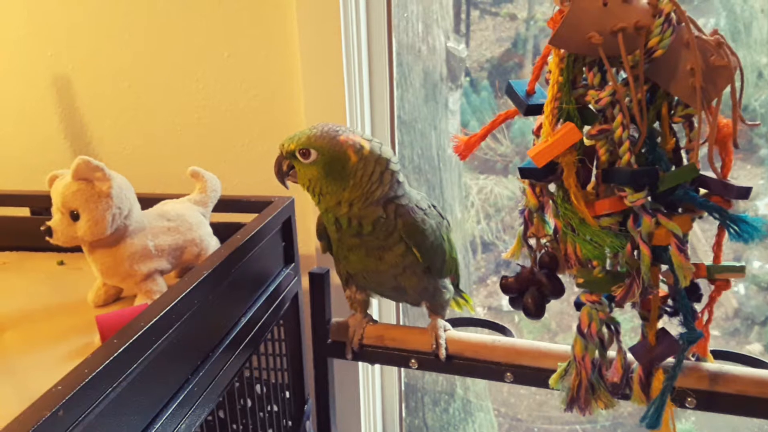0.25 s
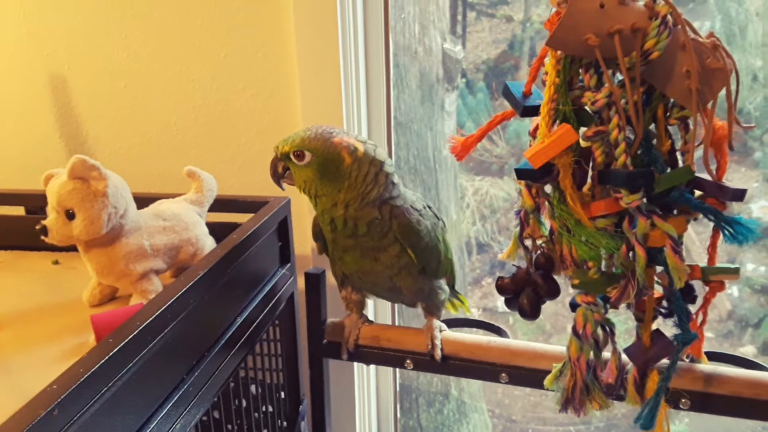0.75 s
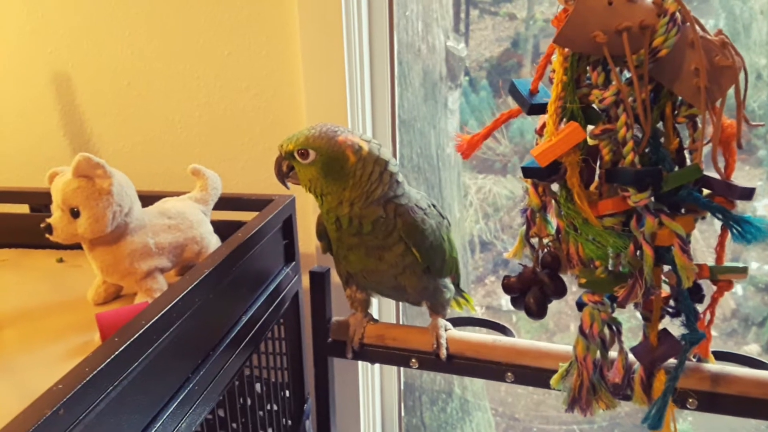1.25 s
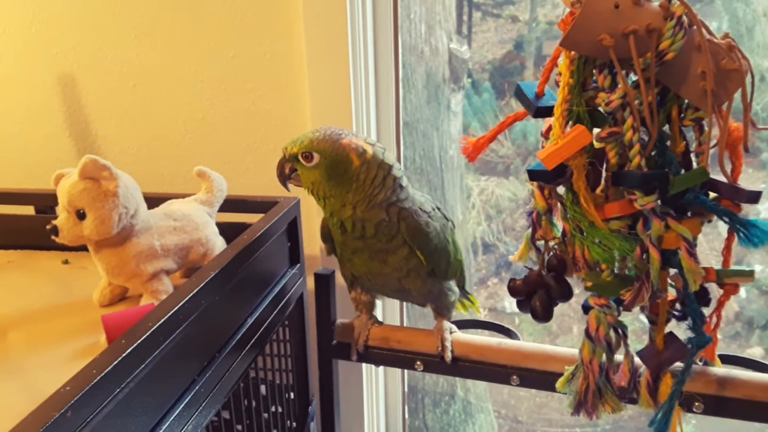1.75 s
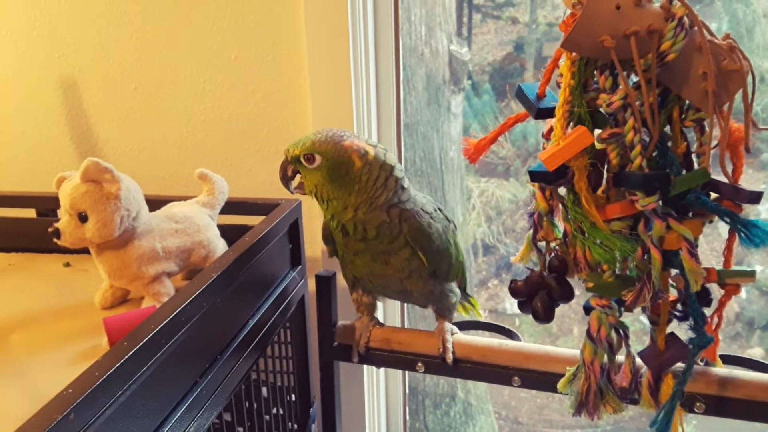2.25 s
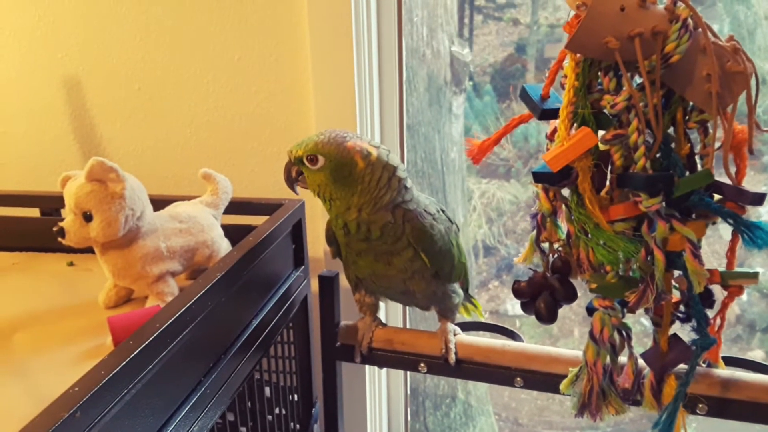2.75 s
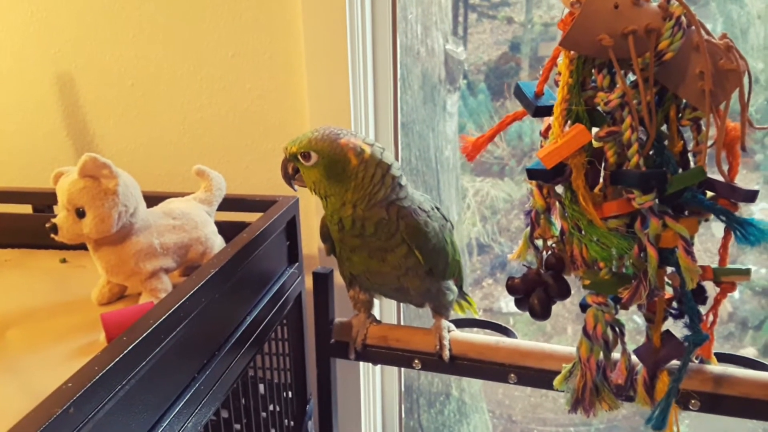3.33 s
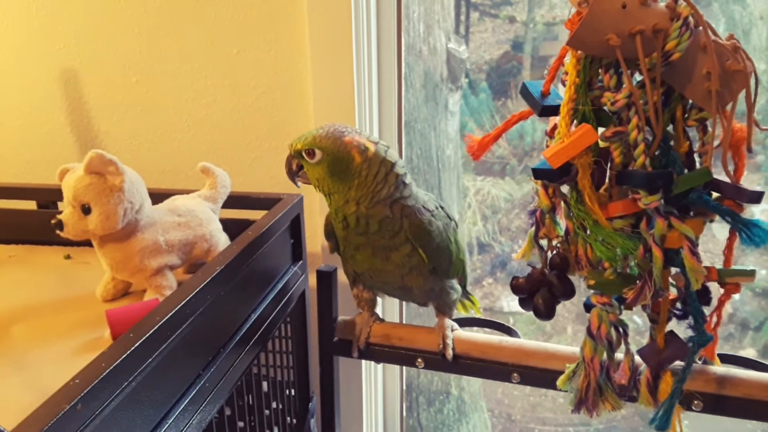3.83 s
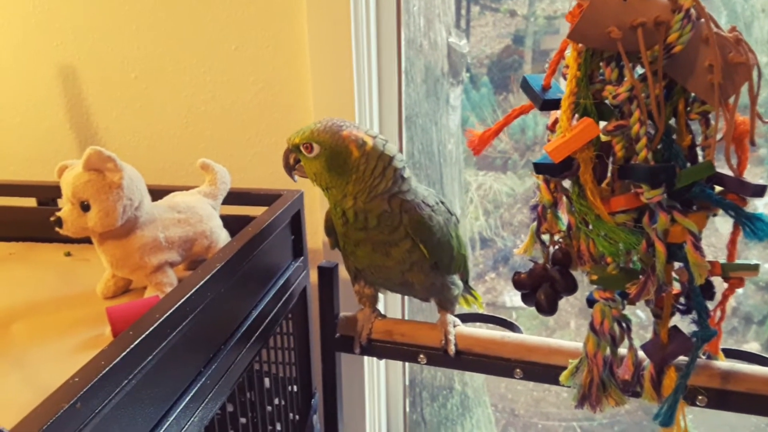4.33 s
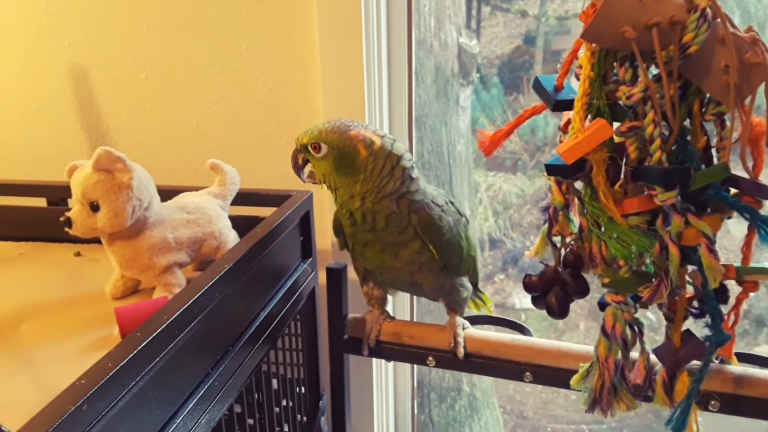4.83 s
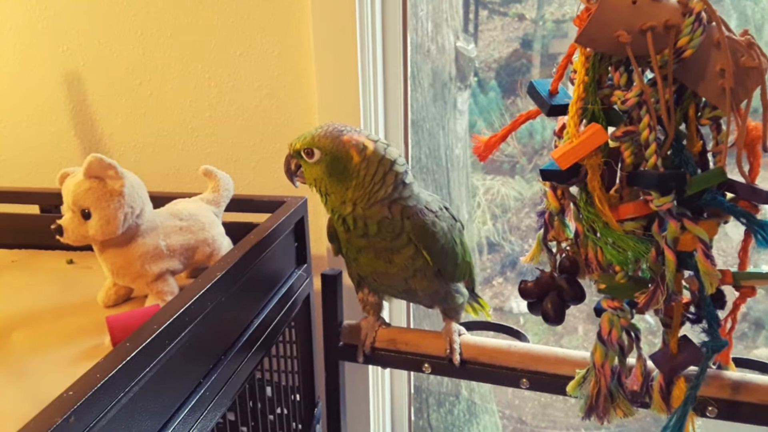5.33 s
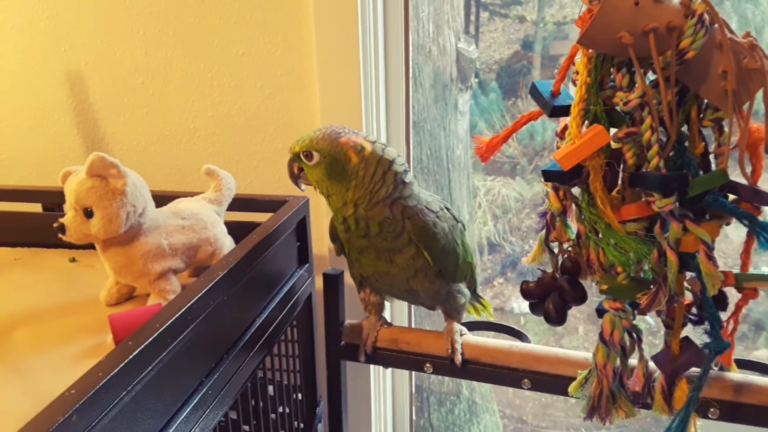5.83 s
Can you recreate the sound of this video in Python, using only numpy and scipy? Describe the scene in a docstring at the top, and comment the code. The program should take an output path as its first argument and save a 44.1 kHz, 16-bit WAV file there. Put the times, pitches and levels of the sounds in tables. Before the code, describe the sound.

Close, harsh parrot calls ring briefly in a small room over faint low hum, with a rattling trill late between silences.

```python
"""In a small furnished room a parrot on a perch squawks an arm's length from a phone with two microphones.
Its voice is a stack of overtones weighed by a throat resonance that moves with the pitch and by the beak, plus
breath noise; it breaks into a rasp in places, and the fourth call heard is a trill. Reflections and a decaying
noise tail make the walls ring after each call, and at the start after a call of which only the echo is heard.
Filtered noise makes a low household hum and a faint, flickering high hiss."""
import sys
import numpy as np
from scipy import signal
from scipy.fft import rfft, irfft
from scipy.io import wavfile
from scipy.ndimage import uniform_filter1d, minimum_filter1d

SR = 44100
rng = np.random.default_rng(int(sys.argv[2]) if len(sys.argv) > 2 else 0)


def file_out(sig):
    """Save sig as 16-bit WAV at sys.argv[1]."""
    # one column per channel
    cols = np.atleast_2d(sig).T
    # limit, then scale
    lim = np.clip(cols, -1, 1)
    pcm = np.round(lim * 32767).astype(np.int16)
    wavfile.write(sys.argv[1], SR, pcm)


def magnitude_from_level(level_db):
    """Linear magnitude for a level in decibels (20 dB per decade)."""
    exponent = np.asarray(level_db, float) / 20
    return 10 ** exponent


N = 268348
LEAD_S = 0.25  # computed ahead of time zero, to hold the earlier call
TIME = np.arange(-int(LEAD_S * SR), N) / SR
M = len(TIME)


def on_log(points, hz, column=1):
    """Interpolates a frequency response linearly on a logarithmic frequency axis."""
    p = np.array(points, float)
    return np.interp(np.log(hz + 1e-9), np.log(p[:, 0]), p[:, column])


def shaped(x, gain):
    """Linear filtering: the spectrum is multiplied by a gain given as a function of Hz."""
    n = x.shape[-1]
    return irfft(rfft(x) * gain(np.fft.rfftfreq(n, 1 / SR)), n)


def band(x, hz, octaves):
    """Band-pass filtering with a Gaussian bell on a logarithmic frequency axis."""
    return shaped(x, lambda f: np.exp(-0.5 * (np.log2(np.maximum(f, 1) / hz) / octaves) ** 2))


def wander(rate):
    """Low-passed noise: a smooth random course that turns about rate times a second, with spread 1."""
    x = shaped(rng.standard_normal(M), lambda f: np.exp(-0.5 * (f / rate) ** 2))
    return x / x.std()


def hum():
    """Stationary coloured noise: a household rumble, coherent at both ports in the bass, not above."""
    # Spectral shape of the mid signal. Each row: frequency in Hz, relative density in dB.
    spectrum = [(15, -75.5), (25, -30), (50, -25), (62, -15.5), (93, -2), (221, -2), (267, -6), (331, -3),
                (433, -15.5), (804, -22), (997, -27.5), (2230, -37.5), (3830, -55), (15500, -49.5)]
    # Stereo width of the hum. Each row: frequency in Hz, side minus mid in dB.
    width = [(60, -18.5), (110, -16), (200, -16), (380, -8), (700, -6), (1290, 1.5), (2380, 2), (4400, 3.5),
             (8120, -0.5), (15000, 3)]
    mid_db = -48.5  # rms level of the mid signal
    noise = rng.standard_normal((2, M))
    mid, side = shaped(noise, lambda f: magnitude_from_level(on_log(spectrum, f)) * (f > 15))
    side = shaped(side, lambda f: magnitude_from_level(on_log(width, f)))
    return magnitude_from_level(mid_db) / mid.std() * (mid + side * np.array([[1], [-1]]))


def thin_hiss():
    """Narrow-band noise: a faint high hiss whose level flickers by random amplitude modulation."""
    # Course of the hiss. Each row: time in seconds, level in dB before the trim and flicker below.
    course = [(.1, -83), (.5, -78), (.9, -95.5)]
    trim_db, flicker_db = -2, 1.5
    x = band(rng.standard_normal((2, M)), 11000, 0.028)
    level_db = np.interp(TIME, *np.transpose(course)) + trim_db + flicker_db * wander(12)
    return x / x.std() * magnitude_from_level(level_db)


def room(x):
    """Room acoustics: direct sound shaded by the phone, early reflections, then exponential reverberant decay."""
    # Decay of the tail. Each row: frequency in Hz, reverberation time (60 dB) in seconds,
    # relative level in dB before the whole tail is scaled.
    decay = [(600, 0.39, -2), (1500, 0.43, 1), (4470, 0.36, 3), (9000, 0.23, 1)]
    # Shading by the phone. Each row: frequency in Hz, left minus right in dB.
    shade = [(500, 2.5), (800, -4), (1300, 4), (1900, 6.5), (2700, 18), (4000, 10.5), (5500, -4.5),
             (8000, -6.5), (14000, 10)]
    # Nearby surfaces. Each row: delay in seconds, left level in dB, right level in dB.
    reflections = [(.0021, -36.5, -12.5), (.009, -25.5, -11)]
    left_lead_s, onset_s = 0.00018, 0.0041
    tail_db = -6.5  # tail energy against an unfiltered impulse, around 1500 Hz

    t = np.arange(SR) / SR
    tail = np.zeros((2, SR))
    for hz in 350 * 2 ** np.arange(0, 5.6, 0.5):
        noise = band(rng.standard_normal((2, SR)), hz, 0.42)
        tail += noise * magnitude_from_level(on_log(decay, hz, column=2) - 60 * t / on_log(decay, hz))
    tail *= np.clip(t / onset_s - 1, 0, 1)  # silent for one onset time, fading in over the next
    tail_energy = np.mean(np.sum(band(tail, 1500, 1) ** 2, axis=1))
    impulse_energy = np.sum(band(np.eye(1, SR)[0], 1500, 1) ** 2)
    tail *= magnitude_from_level(tail_db) / np.sqrt(tail_energy / impulse_energy)

    side = np.array([[0.5], [-0.5]])

    def near(f):
        """Superposition of the straight path and the reflected paths at each port."""
        total = magnitude_from_level(side * on_log(shade, f)) * np.exp(2j * np.pi * f * side * left_lead_s)
        for delay_s, left_db, right_db in reflections:
            arrival_s = delay_s - side * left_lead_s
            total = total + magnitude_from_level(np.array([[left_db], [right_db]])) * np.exp(-2j * np.pi * f * arrival_s)
        return total

    return shaped(x, near) + signal.fftconvolve(x[None], tail)[:, :M]


def parrot():
    """Superposition of all the calls in a row, each with its own source and filter settings."""
    # A call before the microphones open, of which only the echo is heard. Each row: time in seconds,
    # pitch in Hz, level in dB, fundamental in dB against the throat peak.
    earlier_call = [(-.2, 702, -2, -1.6), (-.16, 786, -12.5, -2.1), (-.12, 740, -8.5, -1)]
    # One list for each call heard. Each row: time in seconds, pitch in Hz and level in dB (both before
    # the trill acts), fundamental in dB against the throat peak.
    calls_sung = [
        [(1.322, 563, -36, -1.5), (1.36, 753, -14.5, 7), (1.385, 796.5, -18.5, -15.5), (1.41, 782.2, -15.5, -1),
         (1.425, 624.6, -21.5, -8.5)],
        [(1.66, 584.5, -32.5, -3), (1.685, 612, -13.5, -13), (1.715, 685, -23.5, 0), (1.735, 685.8, -20, -4),
         (1.75, 618, -29, -19)],
        [(1.955, 1100, -24.5, -3.5), (1.965, 1016, -12.5, -10.5), (2.005, 1019, -3, -14),
         (2.037, 777.6, -17, -6.5), (2.06, 724.7, -13, -1.5), (2.09, 859.7, -16, -7), (2.15, 975, -16.5, -1),
         (2.19, 942.7, -12, -6), (2.26, 932.3, -10, -9.5), (2.3, 877, -14, -12), (2.335, 851, -8.5, -14.5),
         (2.355, 825.4, -17.5, -25), (2.375, 851, -5, -13.5), (2.4, 920.7, -7.5, -16), (2.41, 1165, -26.5, 4.5),
         (2.424, 1231, -25.5, 6)],
        [(4.178, 739, -40, 19.5), (4.205, 716.7, -22.5, 10.5), (4.3, 734.6, -20, 2.5), (4.46, 745.5, -18, -0.5),
         (4.635, 757.3, -16, -4.5), (4.668, 748.6, -23, 1.5)],
        [(4.69, 700.4, -16, -5), (4.715, 710.4, -9, 0), (4.738, 796.5, -7.5, -13.5), (4.775, 896.3, -22, 8.5),
         (4.81, 894, -18.5, 27.5), (4.84, 918.6, -17, 6.5), (4.865, 873.5, -17.5, 10),
         (4.885, 907, -25.5, 14.5)],
        [(5.155, 710.5, -27.5, 18.5), (5.18, 751, -13, 5), (5.21, 706.5, -17, 7), (5.24, 639, -14, -23.5),
         (5.27, 600.5, -12.5, -15), (5.297, 669.4, -17, -11), (5.315, 706.7, -18.5, 17),
         (5.335, 690, -20.5, -6)],
    ]
    # Timbre, one row a call, the earlier one first. Each row: throat resonance as a multiple of the pitch,
    # beak in dB before it follows the fundamental, beak resonance in Hz, treble in dB, breath in dB.
    colours = [(2.05, -9, 4300, -25, -33), (2.35, -12, 3900, -30, -31), (2.15, -13.5, 3500, -21.5, -33),
               (2.05, -10, 3800, -3, -26), (1.92, -25.5, 3860, 0, -23), (3.0, -7, 3600, 0.5, -28),
               (2.0, -8.5, 3900, -21.5, -30)]
    out, shake, flutter = np.zeros(M), wander(220), wander(60)
    for rows, colour in zip([earlier_call, *calls_sung], colours):
        span, sound = call(rows, *colour, shake, flutter)
        out[span] += sound
    return out


def call(rows, throat_multiple, beak_db, beak_hz, treble_db, breath_db, shake, flutter):
    """Source-filter principle: partials and breath weighed by throat and beak; returns its span and sound."""
    rise_s, fall_s = 0.0037, 0.0033
    throat_width_hz = 1180
    beak_follows = 0.63  # dB of beak for each dB of fundamental
    shake_rad, slip_rad, flutter_db, spread_rad = 0.33, 0.63, 6.0, 0.6

    s, pitch_hz, db, low_db = np.transpose(rows)
    span = (TIME > s[0] - rise_s) & (TIME < s[-1] + fall_s)
    t = TIME[span]
    gate, sag, trilling = trill(t)
    rasp = rasping(t, trilling)
    low_db = np.interp(t, s, low_db)
    pitch_hz = np.interp(t, s, pitch_hz)
    throat_hz = throat_multiple * pitch_hz  # the throat tunes itself to the pitch
    hz = uniform_filter1d(pitch_hz * sag, 400, mode="nearest")
    phase = 2 * np.pi * np.cumsum(hz) / SR

    # rasping, the pattern repeats only every third cycle: partials appear at thirds of the pitch
    k = np.concatenate([np.arange(3, 24) / 3, np.arange(8, 25)])[:, None]
    f = k * hz
    throat = 1 / (1 + ((f - throat_hz) / (throat_width_hz / 2)) ** 2) ** 2
    beak = magnitude_from_level(beak_db + beak_follows * low_db) * beak_gain(f, beak_hz)
    gains = (throat + beak) * veil(f, treble_db)
    gains = gains * np.where(k % 1 == 0, 1, rasp ** 2) * (f < 16000)
    gains[0] = magnitude_from_level(low_db)
    gains = gains / np.sqrt(np.sum(gains ** 2, axis=0) / 2)  # unit power at every instant

    # the three-cycle pattern slips to and fro
    slip = (k % 1 > 0) * slip_rad * flutter[span] * np.sign(k % 1 - 0.5)
    # the membranes shake unevenly, which smears the upper partials
    smear = (k - 1) * shake_rad * (rasp + 0.033) * shake[span]
    stagger = spread_rad * k ** 2  # the throat staggers the phases
    voice = np.sum(gains * np.cos(k * phase + smear + stagger + slip), axis=0)
    voice = voice * magnitude_from_level(flutter_db * rasp ** 2 * flutter[span])

    breath = rng.standard_normal(len(t)) * (1 + np.cos(phase))  # pulses once a cycle
    breath = shaped(breath, lambda f: beak_gain(f, beak_hz) * veil(f, treble_db) * (f > 600))
    edge = np.clip(np.minimum((t - t[0]) / rise_s, (t[-1] - t) / fall_s), 0, 1)
    return span, (voice + magnitude_from_level(breath_db) * breath) * edge * gate * magnitude_from_level(np.interp(t, s, db))


def beak_gain(f, beak_hz):
    """Resonance: the beak's response keeps its shape and scales with its resonant frequency."""
    # Response of the beak. Each row: frequency as a multiple of the resonance, gain in dB.
    response = [(.16, -3), (.8, -12), (1.0, 1.5), (1.22, -11), (1.4, -11.5), (1.6, -19.5), (2.2, -16),
                (2.6, -34), (3.4, -27), (4.2, -38)]
    return magnitude_from_level(on_log(response, f / beak_hz))


def veil(f, treble_db):
    """Radiation as a shelving filter: how much treble leaves the beak; the very top follows half as far."""
    treble = np.clip((f - 5353) / 300 + 1, 0, 1)
    air = np.clip((f - 7520) / 300, 0, 1)
    return magnitude_from_level(treble_db * (treble - 0.5 * air))


def rasping(t, trilling):
    """Subharmonic bifurcation: the share of rasp, more in the trill, as a call closes and in cracks."""
    # The voice cracks into a rasp, holds it, then heals evenly.
    # Each row: start in seconds, length in seconds, added rasp from 0 to 1.
    breaks = [(2.011, .18, 0.75), (2.334, 0.064, 0), (4.737, .06, .5), (5.288, 0.04, .2)]
    crack_s, hold_share = 0.018, 0.45
    rasp = 0.08 + 0.2 * trilling + 0.35 * np.exp((t - t[-1]) / 0.014)  # steady, trill, closing
    for s, length, depth in breaks:
        corners = [s, s + crack_s, s + hold_share * length, s + length]
        rasp = rasp + np.interp(t, corners, [0, depth, depth, 0])
    return np.clip(rasp, 0, 1)


def trill(t):
    """Amplitude and frequency modulation by airflow pinched shut each puff; returns gain, pitch factor, where."""
    start_s, first_puff_s, puff_grows_s, puffs = 4.175, 0.02449, 0.00047, 18
    scatter_db, lift_db, shut_db = 0.6, 5.0, -30
    skew, sag = 0.7, 0.06
    open_share, outer_share = 0.82, 0.5  # of a puff's length

    # the trill slows down: every puff lasts a little longer than the one before
    n = np.arange(puffs + 1.0)
    s = start_s + first_puff_s * n + puff_grows_s * n * (n - 1) / 2
    db = scatter_db * rng.standard_normal(puffs) + lift_db
    u = np.interp(t, s, n)
    row = np.minimum(u.astype(int), puffs - 1)
    outer = (row == 0) | (row == puffs - 1)  # the outer puffs die early
    part = np.clip(u % 1 / np.where(outer, outer_share, open_share), 0, 1)
    puff = np.abs(np.sin(np.pi * part ** skew)) * magnitude_from_level(db[row])
    inside = (t > s[0]) & (t < s[-1])
    gain = np.where(inside, magnitude_from_level(shut_db) + puff, 1)
    return gain, np.where(inside, 1 + sag * (0.4 - part), 1), inside


def scene():
    """Superposition of the bird in its room, the hum and the hiss, from time zero on."""
    return (room(parrot()) + hum() + thin_hiss())[:, M - N:]


def top_cut(x):
    """Nothing passes above the cut-off."""
    return signal.sosfilt(signal.butter(12, 15750, fs=SR, output="sos"), x)


def record(dry):
    """Peak limiting: the microphones open late, and one gain turns both channels down around loud peaks."""
    open_s, fade_s, ceiling, top_hz = 0.104, 0.0018, 0.98, 15750
    opened = dry * np.clip((np.arange(N) / SR - open_s) / fade_s, 0, 1)
    allowed = np.minimum(1, ceiling / (np.abs(opened).max(axis=0) + 1e-9))
    gain = uniform_filter1d(minimum_filter1d(allowed, size=400), size=300)
    mix = shaped(opened * gain, lambda f: f < top_hz)
    return top_cut(mix)


dry = scene()
out = record(dry)
file_out(out)
```